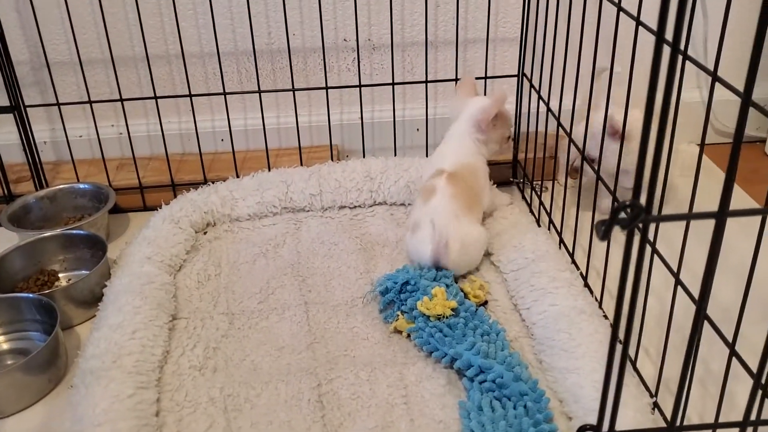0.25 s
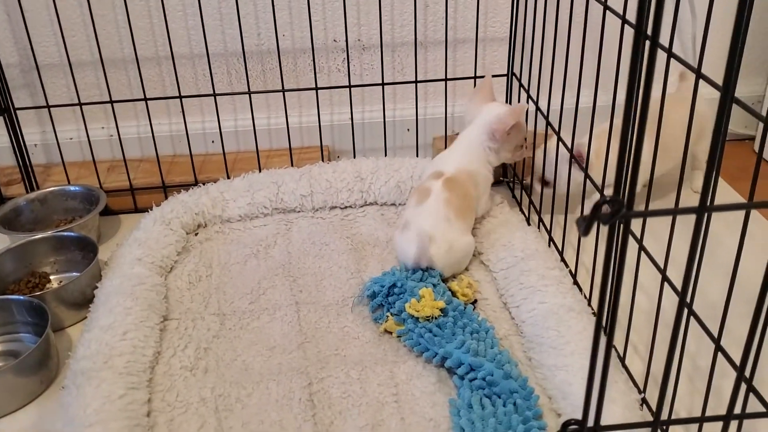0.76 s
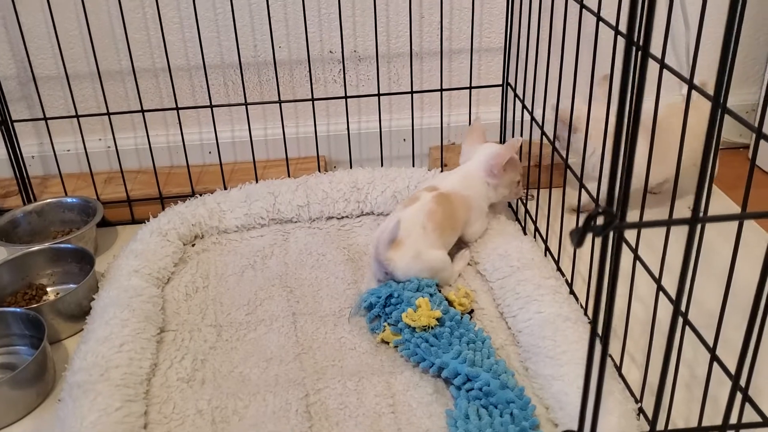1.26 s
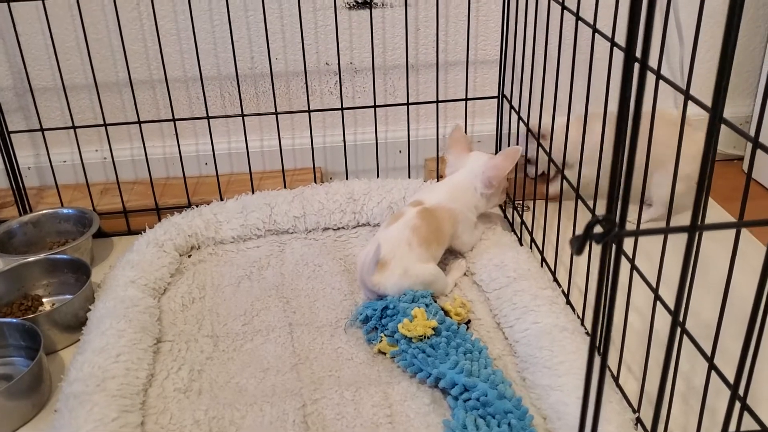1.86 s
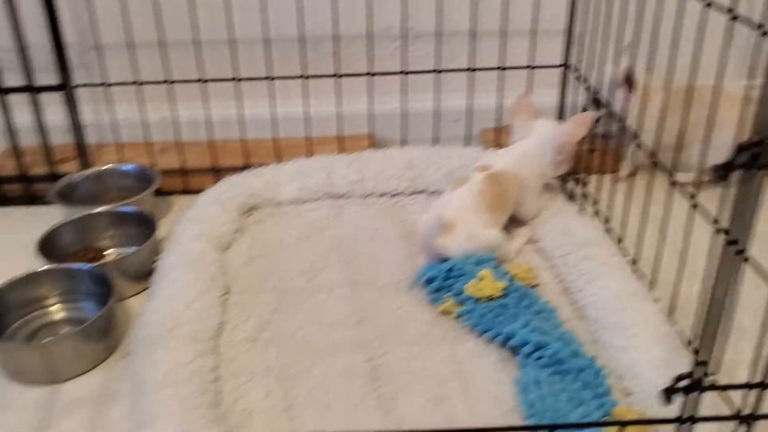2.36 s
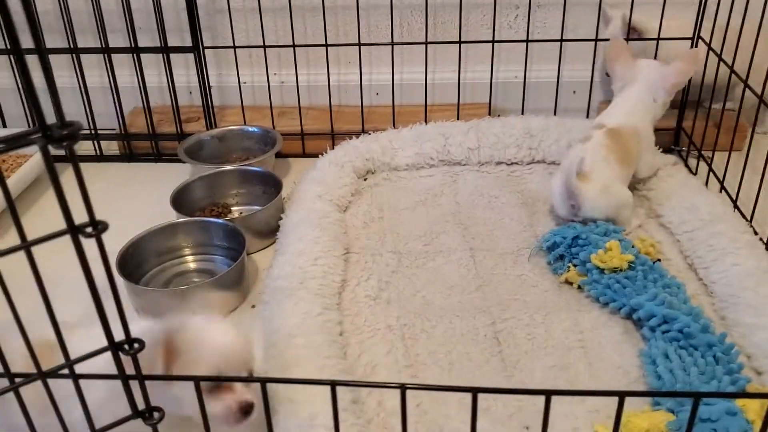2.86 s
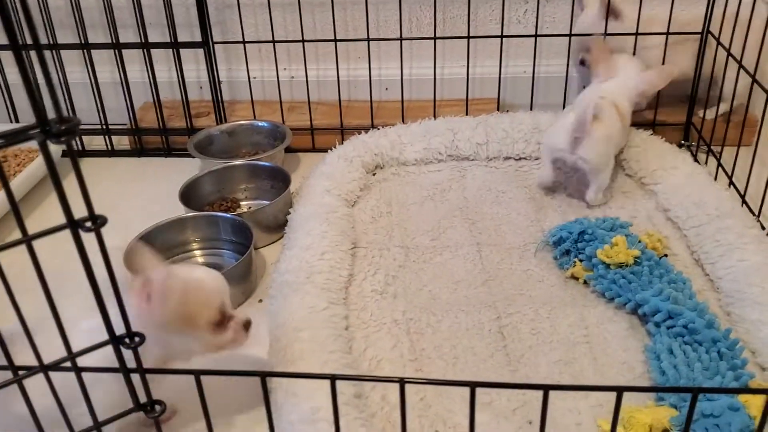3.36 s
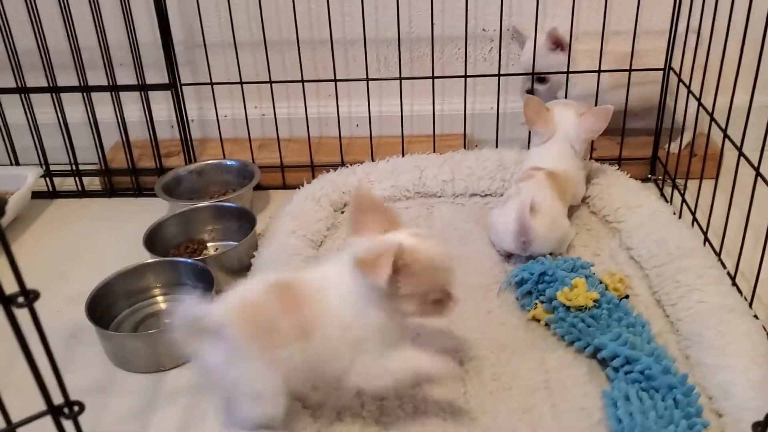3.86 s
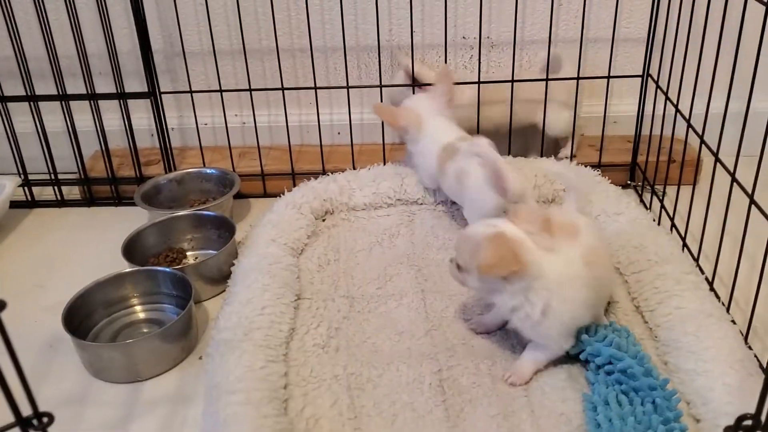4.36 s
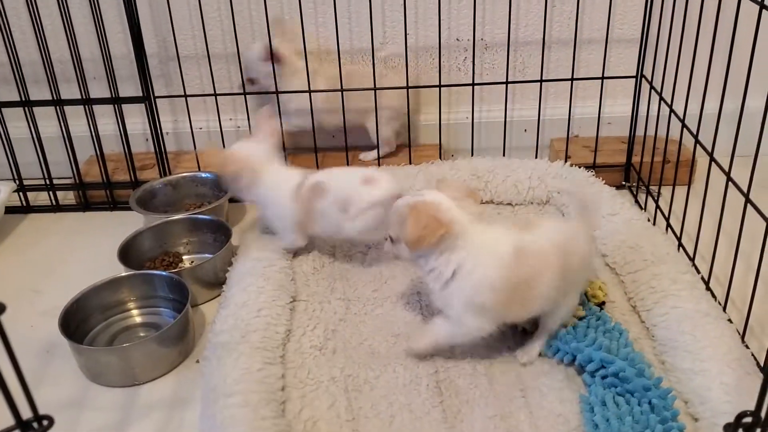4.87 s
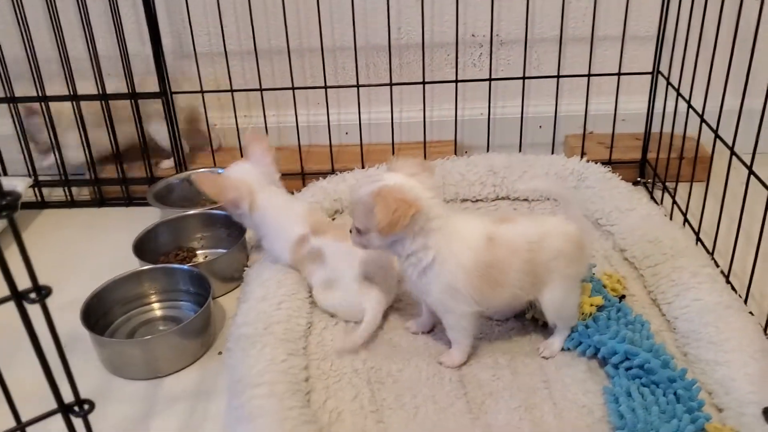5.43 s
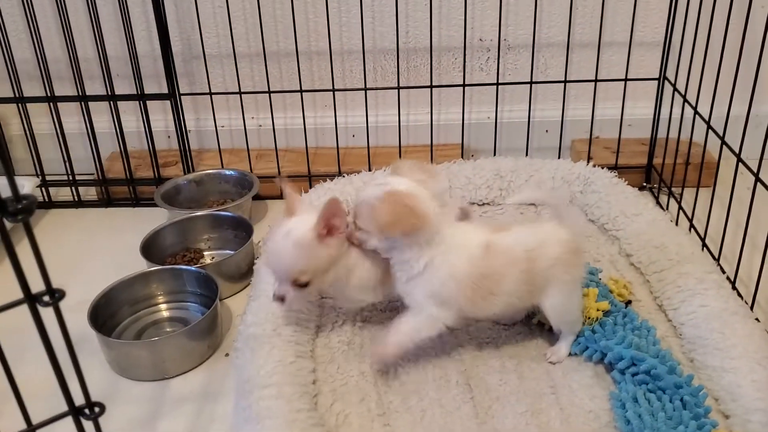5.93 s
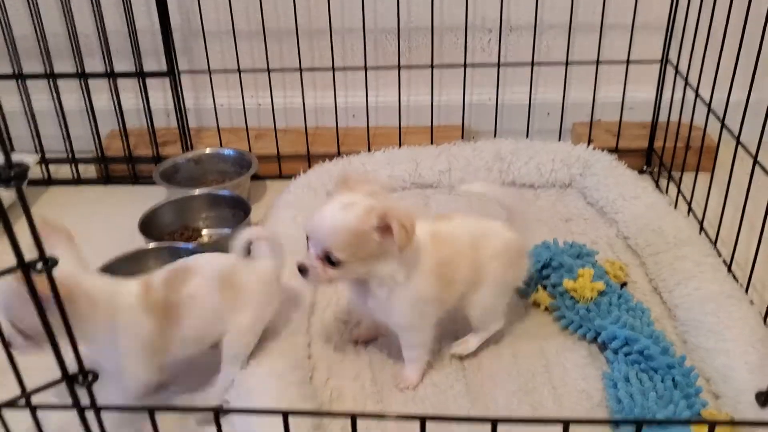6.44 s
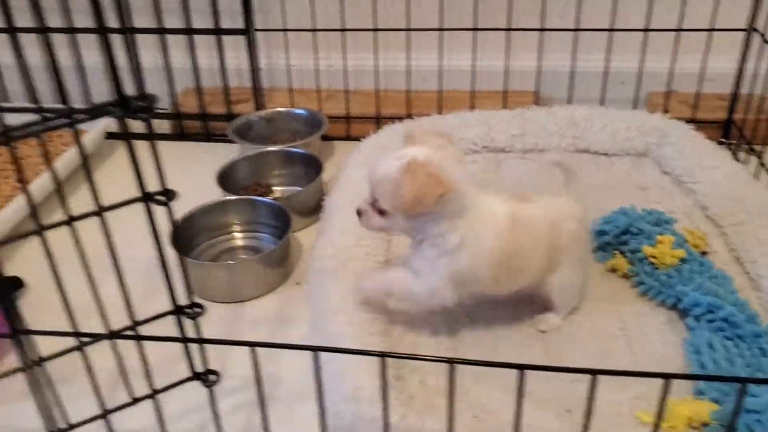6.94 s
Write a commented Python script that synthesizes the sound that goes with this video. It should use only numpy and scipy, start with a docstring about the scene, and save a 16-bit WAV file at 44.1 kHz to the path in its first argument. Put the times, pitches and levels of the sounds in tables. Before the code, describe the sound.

Small puppies are heard from nearby in a wire pen, in a hard-walled room with a short echo. During the first 0.7 seconds come a few faint, very brief whimpers, with light claw ticks, soft paw bumps and fleece rubbing. Sparse ticks on floor and wire continue, with another faint whimper near 2.5 seconds. At 3.3 seconds a puppy gives a short low growl, and at 3.6 one sharp, high yip, starting hoarse and snapping into a clean shriek. It is the loudest sound, somewhat to the right. Soft whimpers follow around 4.3 and 5 seconds amid quiet steps. From 5.9 to 6.2 seconds a quick run of rough little growls drops in pitch. Paws then thump the floor and rustle over a fleece bed until the end, strongest near 6.35 and 6.95 seconds. A faint hiss and low wavering rumble lie underneath, the rumble swelling near the end.

```python
"""In a small hard-walled room, little puppies in a wire pen whimper, growl and give one sharp yip.
Each voice is a buzz from the vocal folds, mixed with puffs of air and shaped by a tiny throat.
Claws tick on the floor and wire; paws thump the floor and rustle over a fleece bed.
Behind them lie a low wavering rumble and a faint hiss. A noise suppressor opens on each sound."""
import sys
import numpy as np
from scipy import signal
from scipy.fft import rfft, irfft
from scipy.io import wavfile
from scipy.ndimage import uniform_filter1d, minimum_filter1d

SR = 44100
rng = np.random.default_rng(int(sys.argv[2]) if len(sys.argv) > 2 else 0)


def digitize_waveform(pressure):
    """Quantize a signal to 16-bit integers and store it at the path in sys.argv[1].

    Rows of a 2-D input are taken as channels; values are limited to [-1, 1].
    """
    field = np.atleast_2d(pressure).T
    bounded = np.clip(field, -1, 1)
    quanta = np.round(bounded * 32767).astype(np.int16)
    wavfile.write(sys.argv[1], SR, quanta)


N = 317520
TIME = np.arange(N) / SR

# Whimpers and growls. Each row: start, rise and fall in seconds, peak effort and fade in dB,
# start, peak and end pitch in Hz, roughness 0-1, mouth factor (scales resonance frequencies),
# strain in dB, mouth resonance in dB, damping (scales resonance widths), left over right in dB,
# left delay in ms, direct sound gain in dB.
SYLLABLES = [ (0, 0.0033, 0.073, -47, -7.5, 640, 611.6, 570.3, 0.26, 1.21, -12, 2.5, 2.6, -8, 0.29, 0),
             (.125, 0.03, 0.031, -50.5, -21, 552, 698, 634, 0.11, 0.92, -30, -11, 2.6, 8, 0.13, -2),
             (.19, .018, .02, -50, -3, 613, 548.5, 535, 0.75, 0.79, -37, -8, 3.2, -3, 0.16, -1),
             (.565, 0.006, 0.042, -70, -10, 640, 630, 585, 0.48, 0.76, -25, 4, 0.44, -1, 0.28, 4),
             (.655, 0.019, 0.031, -52.5, -7.5, 434, 485, 499, 0.46, 1.16, -39, -7.5, 1.6, -4, 0.2, -2.5),
             (2.125, 0.013, 0.073, -77.5, -16, 1910, 1990, 1880, 0.48, 0.94, -22, 16, 1.3, -13, 0, -4),
             (2.543, 0.021, 0.11, -49.5, -8.5, 410, 400, 313.5, 0.6, 1.105, -44, -11.5, 1.6, -2.5, -0.16, -1.5),
             (3.343, 0.038, 0.058, -27, -14.5, 199.2, 253.3, 224.4, 0.69, .96, -1.5, 3, 0.9, -2.5, -0.19, -10.5),
             (4.262, .025, 0.11, -45, -11, 430, 503.2, 467.4, 0.61, 0.79, -7.5, -4, 1.34, -5, 0, -4),
             (4.385, 0.021, 0.14, -52.5, -13, 455.4, 402.2, 372.2, 0.454, .86, -39, -6, 2.1, -3, 0, -1),
             (4.978, 0.027, 0.12, -44, -22.5, 749.4, 498.5, 478, .5, 1.37, -21, 6, 4.1, -7, .22, -6),
             (5.24, 0.0091, 0.028, -65, -11, 847, 850, 856, 0.42, 1.08, -25, 4.5, 0.62, -20, 0.031, -4),
             (5.863, 0.0047, 0.027, -36.5, -15, 427, 417, 370, 0.63, 1.37, -12.5, -8.5, 0.92, -0.5, -0.18, -3.5),
             (5.892, 0.0083, .06, -38, -4, 329, 265.9, 184.2, 0.67, 1.09, -35, -7, 1.5, .5, -0.2, -5.5),
             (5.955, 0.04, .035, -33, 4.5, 181, 191.2, 147, 0.72, 1.086, -54, -5, 0.55, 3, -0.37, -6),
             (6.03, 0.0384, 0.0986, -31, -18.5, 151.3, 142.5, 124.2, 0.494, 1.065, -7, -1, 0.95, -3, -0.27, 1)]
# The yip, a hoarse start that snaps to a clean shriek. Each row: time in seconds, effort in dB,
# pitch in Hz, roughness, mouth factor, strain in dB.
YIP = [(3.565, -36.5, 941.6, 1.22, 1, -14.5), (3.582, -28, 853.5, 0.79, 0.89, 2.5),
       (3.597, -14.5, 1265, 0.52, .92, 5), (3.606, -18, 1269, 0.01, 0.97, 17.5),
       (3.63, -18.5, 1249, 0.1, 1, 15.5), (3.637, -21.5, 1190, 0.1, 1, 7.5),
       (3.648, -28.5, 1168, 0.2, 1, 9.5), (3.666, -22.5, 1163, 0.5, 0.94, -6),
       (3.69, -36, 980, 0.02, 1, -4)]
# Resonances that shape the voice. Each row: frequency in Hz, width in Hz, gain in dB.
LOWER_THROAT = [(354.1, 370, -3.5), (749, 425, 4.5)]
UPPER_THROAT = [(4160, 1700, 4), (5570, 500, 3), (6650, 1100, -4), (8800, 560, -28.5)]
MOUTH = [(1884, 443, 5.5), (2510, 600, -7)]
# Claw taps. Each row: start in seconds, snap level in dB, knock over snap in dB, left over right in dB.
TICKS = [(0.1617, -42, -16, -29), (0.2643, -44, -12, -17), (0.3765, -50, -7, -18.5), (0.57, -50.5, -13, 2),
         (0.715, -53.5, 2.5, -9), (1.3473, -53, -14, 4), (1.412, -52, -36, -9.5), (1.4663, -50, -48, 19.5),
         (1.7226, -43, -11, -8.5), (1.7795, -51.5, -43, -17), (1.9033, -43, -37, -17.5),
         (2.372, -52.5, -29, -12), (2.6433, -45.5, -5, -1.5), (2.708, -42, -25, -13.5),
         (3.0118, -47, -22, -13.5), (3.075, -46, -23, -3.5), (3.0994, -59.5, -0.5, 7),
         (3.1898, -48, -7.5, -7.5), (3.2144, -72, -7, -6), (3.3027, -42.5, -10.5, 2.5), (3.3255, -59, 5, 1),
         (3.71, -30, -8.5, 12), (4.5633, -44, -32, -15), (4.9842, -38, -1.5, 1.5), (5.2624, -42.5, -31, -6),
         (5.4388, -39, -45, 1), (5.665, -48.5, -17.5, 13), (5.7169, -37, -14.5, -4), (5.7697, -37, -13, 0),
         (5.9573, -38.5, -12, -10), (6.336, -29, -13.5, -3.5), (6.4814, -43, 7, -8), (6.7155, -49, -11, 5),
         (6.7815, -41, -8, -5)]
# Paw landings. Each row: start in seconds, peak in dB, brightness in dB per octave,
# rough ringing time in seconds.
THUMPS = [(0.044, -44, 11, 0.079), (.171, -44.5, -11.5, .082), (1.719, -54.5, -5, 0.13),
          (2.369, -54.5, -7, 0.15), (2.968, -49.5, -7.5, 0.19), (3.7, -50, -10, .22),
          (4.399, -47, -11, 0.1), (4.488, -46.5, -4.5, 0.094), (4.705, -56.5, -18, 0.073),
          (5.094, -43.5, -8, 0.036), (5.441, -46, -3.5, 0.099), (6.22, -46, -7.5, 0.16),
          (6.351, -22.5, 2.5, 0.1), (6.48, -36.5, -8, 0.097), (6.723, -38.5, 0.5, 0.068),
          (6.792, -35, -11, 0.04), (6.917, -30.5, -13, 0.073), (6.945, -20, -5, 0.068),
          (7.135, -30, -12.5, 0.066)]
# The notes the floor rings at. Each row: frequency in Hz, gain in dB.
FLOOR_NOTES = [(110, -4.5), (183, 6), (250, 4.5), (305, -0.5), (365, 5), (470, 3), (620, -2), (800, -6),
               (1000, -23)]
# Rubs on the fleece. Each row: peak time in seconds, relative level in dB, rise in seconds,
# fade in dB per second, extra gain below 5 kHz in dB.
STROKES = [(.165, -59, 0.012, 92, 1.5), (.262, -60.5, .006, 255, -12), (.372, -68.5, .01, 119, 6),
           (0.734, -58, 0.028, 165, -0.5), (2.55, -65.5, .004, 205, -24), (2.709, -59, 0.0057, 302, -10),
           (3.011, -74, 0.0034, 97, -10.5), (4.069, -60, 0.024, 229, -11.5), (4.365, -61.5, .012, 56, -0.5),
           (4.57, -65, 0.1, 299, -6), (4.725, -76.5, .004, 120, -2.5), (4.983, -46.5, 0.0034, 73, 0),
           (5.097, -58, 0.021, 240, 12.5), (5.262, -63, 0.018, 170.5, -10),
           (5.438, -63.5, 0.0062, 182.5, -12), (5.72, -69, .015, 52, -8.5), (5.92, -52.5, 0.028, 303, -13),
           (6.058, -47.5, 0.046, 208, 11), (6.135, -49.5, 0.0083, 100.5, -8),
           (6.236, -51.5, 0.041, 151.5, 0), (6.335, -54, 0.0029, 86, -10), (6.436, -58.5, 0.038, 138, 3),
           (6.714, -59.5, 0.011, 64, 9.5), (6.799, -44.5, 0.018, 60, -7.5), (6.907, -41, 0.038, 65, -4),
           (7.072, -50, 0.025, 159.5, -27)]
# How the rumble wavers. Each row: time in seconds, level in dB.
RUMBLE_LEVELS = [(0, -54.5), (.1, -57.5), (.5, -62), (1.0, -65.5), (1.6, -68), (2.2, -66.5), (3.15, -63),
                 (4.2, -67), (4.5, -67), (5.3, -62.5), (5.52, -69.5), (5.75, -56.5), (6.08, -60.5),
                 (6.17, -51.5), (6.82, -52), (6.96, -43), (7.2, -81)]
# The tone colour of each noise. Each row: frequency in Hz, relative level in dB.
BREATH_COLOUR = [(1500, -33), (4000, -14.5), (8000, -30), (10000, -30), (16000, -36.5)]  # air rushing past the teeth
CLAW_COLOUR = [(1000, -33.5), (2000, -29), (3500, -8), (6500, -3), (9000, -12), (12000, -10), (16000, -8)]
FLEECE_COLOUR = [(350, -22), (600, -0.5), (1040, -12.5), (1770, -4), (3790, -2.5), (8960, -11.5),
                 (15200, -7.5), (15800, -9.5), (16500, -25.5)]
RUMBLE_COLOUR = [(12, -66.5), (20, -33), (43, -9.5), (103, 6.5), (145, -15.5), (210, -4), (236, -7.5),
                 (468, -23.5), (568, -32), (700, -27.5), (910, -65), (1540, -120)]
HISS_COLOUR = [(240, -23), (400, -5), (538, -7), (1000, -8.5), (1840, -9), (5730, -9), (6900, -1.5),
               (10500, -13), (15000, -8), (15700, -14.5), (16500, -20)]
# How alike left and right sound. Each row: frequency in Hz, likeness (1 means identical).
LIKENESS = [(60, 0.95), (180, 0.945), (550, 0.59), (1650, -0.09), (4970, -0.048), (15000, -0.084)]
# How long the room echoes. Each row: frequency in Hz, seconds to fade by 60 dB.
ECHO_TIMES = [(150, 0.38), (600, 0.31), (2500, 0.34), (6000, 0.32), (14000, 0.2)]


def puppy_voice(rows, mouth_db, damping):
    """Uneven pulses and puffs of air pass through a small throat; strain brings out its high ring."""
    times, *columns = np.transpose(rows)
    t = np.arange(times[0], times[-1], 1 / SR)
    effort_db, hz, rough, mouth, strain_db = (np.interp(t, times, c) for c in columns)
    jitter, shimmer = flutter(len(t), 120), flutter(len(t), 200)
    cycles = np.cumsum(hz * (1 + (0.0012 + 0.25 * rough ** 2) * jitter)) / SR
    folds = sum(np.cos(2 * np.pi * k * cycles) for k in range(1, int(9200 / hz.max()) + 1))
    folds = normalise(folds * gain_of(4 * rough * shimmer))  # uneven pulses give a growl its grain
    puffs = normalise((0.055 + np.exp(-(cycles % 1) / 0.88)) * rng.standard_normal(len(t)))
    air = np.clip(rough, 0, 1) ** 2
    slack = np.clip(rough - strain_db / 25, 0, 1)  # slack folds give only air up high
    drive = (1 - air) * folds + air * puffs
    husky = (1 - np.sqrt(air)) * folds + np.sqrt(air) * puffs  # air shows more in higher resonances
    opening = gain_of(mouth_db + 0.81 * (effort_db - effort_db.max()))  # effort opens the mouth
    mouth_ring = opening * throat(MOUTH, husky, mouth, damping)
    lower = normalise(throat(LOWER_THROAT, drive, mouth, damping) - mouth_ring)
    upper = normalise(throat(UPPER_THROAT, (1 - slack) * folds + slack * puffs, 0.92, 0.99))
    breath = coloured(puffs, BREATH_COLOUR)
    strain = gain_of(strain_db)
    voice = (lower + strain * upper) / np.sqrt(1 + strain ** 2) + breath
    return gain_of(effort_db) * voice * signal.windows.tukey(len(t), .06)


def syllable(start, rise, fall, peak_db, fade_db, start_hz, peak_hz, end_hz, rough, mouth, strain_db):
    """Plans a call in rows like YIP's. As it fades, it roughens, the mouth closes and strain eases."""
    times = start + np.r_[0, rise + fall * np.linspace(0, 1, 9)]
    spent = np.clip((times - start - rise) / fall, 0, 1)
    change_db = np.where(times > start, fade_db * spent ** 1.07, -8)  # starts 8 dB under the peak
    hz = np.interp(times - start, [0, rise, rise + fall], [start_hz, peak_hz, end_hz])
    return np.transpose([times, peak_db + change_db, hz, rough + 0.26 * spent,
                         mouth * 0.9 ** spent, strain_db + 2.5 * change_db])


def throat(resonances, x, mouth, damping):
    """The air in the throat rings at several frequencies, added with alternating signs."""
    return sum((-1) ** k * gain_of(db) * resonate(x, hz * mouth, width * damping)
               for k, (hz, width, db) in enumerate(resonances))


def puppies():
    """Every call, twice: as it goes out into the room, and as it reaches the listener directly."""
    to_room, direct = np.zeros((2, 2, N))
    calls = [(syllable(*row[:11]), *row[11:]) for row in SYLLABLES]
    calls.append((YIP, 14, 0.7, -10, -0.15, 0.5))  # named on the next line
    for rows, mouth_db, damping, pan_db, lag_ms, direct_db in calls:
        sound = puppy_voice(rows, mouth_db, damping)
        add(to_room, rows[0][0], sound, pan_db)
        add(direct, rows[0][0], gain_of(direct_db) * sound, pan_db, lag_ms)
    return to_room, direct


def claws():
    """Each claw tap is a tiny snap of noise, some with a duller knock underneath."""
    mix, t = np.zeros((2, N)), np.arange(512) / SR
    for start, db, knock_db, pan_db in TICKS:
        burst = rng.standard_normal(len(t))
        snap = coloured(burst, CLAW_COLOUR) * (np.exp(-t / 0.00081) + 0.38 * np.exp(-t / 0.0047))
        knock = resonate(burst * np.exp(-t / 0.0011), hz=732, width_hz=305.6)
        knock += 0.38 * resonate(burst * np.exp(-t / 0.0016), hz=1300, width_hz=1100)
        tick = snap / abs(snap).max() + gain_of(knock_db) * knock / abs(knock).max()
        add(mix, start, gain_of(db) * tick, pan_db)
    return mix


def paws():
    """A paw rings the floor's notes, a little detuned by where it lands; high notes die sooner."""
    mix, t = np.zeros((2, N)), np.arange(SR // 4) / SR
    hz, note_db = np.transpose(FLOOR_NOTES)[:, :, None]
    octaves = np.log2(hz / hz[0])
    for start, db, brightness, ring_s in THUMPS:
        detuned_hz = hz * (1 + .07 * rng.standard_normal(hz.shape))
        fade_db = 60 * t / ring_s * (0.5 + 0.59 * octaves)
        notes = gain_of(note_db + brightness * octaves - fade_db) * np.sin(2 * np.pi * detuned_hz * t)
        rise_s = max(0.0049 - 0.00045 * brightness, 0.0005)  # a duller landing is a slower push
        ring = notes.sum(0) * (1 - np.exp(-(t / rise_s) ** 2))
        add(mix, start, gain_of(db) * ring / abs(ring).max(), pan_db=0)
    return mix


def fleece_rustle():
    """Paws and fur rub the fleece: grainy noise, split in two so each stroke has its own brightness."""
    high, low = np.zeros((2, N))
    for peak_s, db, rise, fade_rate, low_db in STROKES:
        age = TIME - peak_s
        shape_db = np.where(age < 0, 10.5 * age / rise, -fade_rate * age)
        power = gain_of(db + shape_db) ** 2 * (age > -rise)  # starts abruptly, 10.5 dB under its peak
        high += power
        low += power * gain_of(low_db) ** 2
    high, low = (uniform_filter1d(np.sqrt(power), size=90) for power in (high, low))
    grain = gain_of(2 * flutter((2, N), 60))
    friction = noise(FLEECE_COLOUR, patchy_db=1.5, size=256) * normalise(grain)
    dull = signal.sosfilt(signal.butter(2, 5000, fs=SR, output="sos"), friction)
    return gain_of(4) * (high * (friction - dull) + low * dull)


def room_echo(x):
    """Hard walls throw back many quick echoes; each frequency band dies at its own speed."""
    echoes = np.zeros((2, SR // 2))
    delays = np.arange(200, SR // 2 - 20, 20) + rng.integers(0, 20, (2, (SR // 2 - 201) // 20))
    np.put_along_axis(echoes, delays, rng.choice([-1., 1.], delays.shape), 1)
    hz, t, bands = signal.stft(echoes, SR, nperseg=256)
    fade = gain_of(-60 * t / look_up(ECHO_TIMES, hz)[:, None])
    tail = signal.istft(stereo(bands, hz) * fade, SR, nperseg=256)[1]
    centred = x.mean(0) + 0.13 * (x - x.mean(0))  # echoes keep little of a sound's left-right lean
    return signal.fftconvolve(centred, tail / np.linalg.norm(tail[0]), axes=1)[:, :N]


def rumble():
    """Deep noise that swells and sinks."""
    level_db = np.interp(TIME, *np.transpose(RUMBLE_LEVELS))
    return gain_of(level_db) * noise(RUMBLE_COLOUR, patchy_db=2.2, size=1024)


def hiss():
    """Faint, bright noise that flickers."""
    return gain_of(-72.5) * noise(HISS_COLOUR, patchy_db=4, size=512)


def noise_suppressor(x, depth_db, margin_db):
    """Turns down each band while it is quiet; a louder sound holds it open for a tenth of a second."""
    hz, _, bands = signal.stft(x, SR, nperseg=256)
    power = uniform_filter1d(uniform_filter1d((abs(bands) ** 2).mean(0), 15, 0), 3, 1)
    level_db = 10 * np.log10(power + 1e-20)
    over_db = level_db - np.percentile(level_db, 20, axis=1, keepdims=True)
    held_db = -minimum_filter1d(-over_db, size=33, axis=1, origin=15)
    shut = np.clip(3 - (held_db - margin_db) / 5, 0, 1)
    shut *= np.clip(hz / 600, 0, 1)[:, None]  # spares the bass
    cut_db = depth_db * uniform_filter1d(shut, size=3, axis=1)
    return signal.istft(bands * gain_of(-cut_db), SR, nperseg=256)[1][:, :N]


def noise(colour, patchy_db, size):
    """Stereo noise of a given colour, with drifting louder and softer patches."""
    hz, _, bands = signal.stft(rng.standard_normal((2, N)), SR, nperseg=size)
    patches = rng.standard_normal(bands[0].shape)
    patches = normalise(uniform_filter1d(uniform_filter1d(patches, 8, 0), 5, 1))
    bands = stereo(bands, hz) * gain_of(look_up(colour, hz)[:, None] + patchy_db * patches)
    return normalise(signal.istft(bands, nperseg=size)[1][:, :N])


def stereo(bands, hz):
    """Left and right get nearly the same bass but unrelated treble."""
    same = look_up(LIKENESS, hz)[:, None]
    return np.array([bands[0], same * bands[0] + np.sqrt(1 - same ** 2) * bands[1]])


def resonate(x, hz, width_hz):
    """A resonance that can glide: shifts hz down to zero, smooths twice and shifts back."""
    turn = np.exp(2j * np.pi * np.cumsum(hz * np.ones(len(x))) / SR)
    r = np.exp(-np.pi * width_hz / SR)
    return 2 * (turn * signal.lfilter([(1 - r) ** 2], [1, -2 * r, r * r], x / turn)).real


def coloured(x, colour):
    """Gives a sound the tone colour in a table."""
    hz = np.fft.rfftfreq(len(x), 1 / SR)
    return irfft(rfft(x) * gain_of(look_up(colour, hz)), len(x))


def flutter(shape, samples):
    """A random wobble, smoothed over some samples."""
    return normalise(uniform_filter1d(rng.standard_normal(shape), size=samples))


def add(mix, start, sound, pan_db, lag_ms=0):
    """Places a sound in the mix, with the left side pan_db louder and lag_ms later."""
    for channel, side in zip(mix, (1, -1)):
        first = max(round((start + side * lag_ms / 2000) * SR), 0)
        part = channel[first:first + len(sound)]
        part += gain_of(side * pan_db / 2) * sound[:len(part)]


def look_up(table, hz):
    """Reads between a table's rows on a log-frequency scale."""
    row_hz, value = np.transpose(table)
    return np.interp(np.log(hz + 1), np.log(row_hz + 1), value)


def normalise(x):
    """Scales to an average (rms) level of 1."""
    return x / np.sqrt(np.mean(x ** 2) + 1e-20)


def gain_of(db):
    """Turns decibels into a factor."""
    return 10 ** (np.asarray(db) / 20)


def scene():
    """Voices, claws and paws echo in the room, over rustle, rumble and hiss."""
    to_room, voices = puppies()
    ticks, thumps = claws(), paws()
    echo = room_echo(gain_of(-0.5) * to_room + gain_of(5) * ticks + gain_of(-2.5) * thumps)
    background = rumble() + hiss()
    return voices + ticks + thumps + echo + fleece_rustle() + background


def record(dry):
    """Suppresses noise, rounds off any peak near full scale and cuts the highest treble."""
    quiet = noise_suppressor(dry, depth_db=2, margin_db=1)
    rounded = quiet / (1 + abs(quiet / .97) ** 6) ** (1 / 6)
    low_pass = signal.firwin(511, 16150, window=("kaiser", 9), fs=SR)
    return signal.oaconvolve(rounded, low_pass[None], "same")


dry = scene()
out = record(dry)
digitize_waveform(out)
```